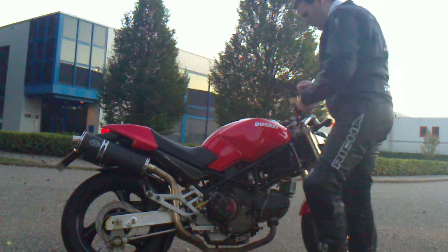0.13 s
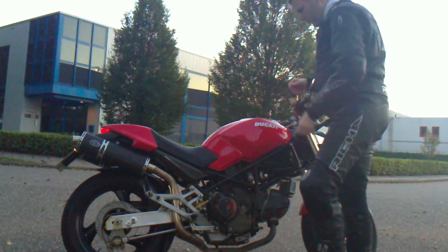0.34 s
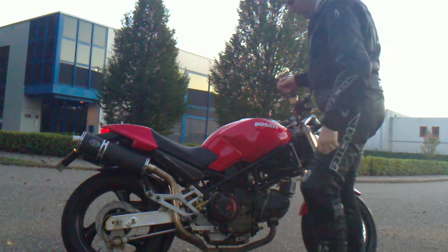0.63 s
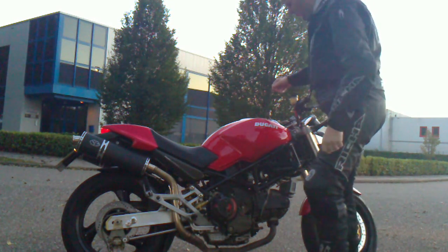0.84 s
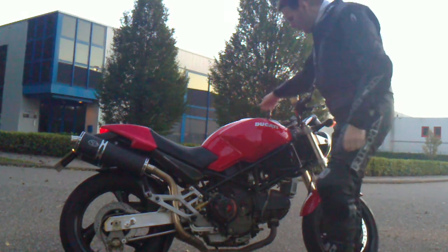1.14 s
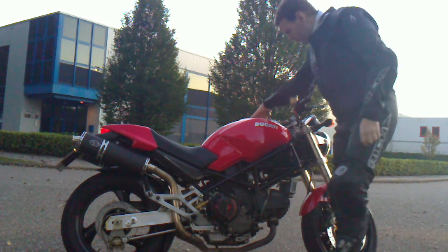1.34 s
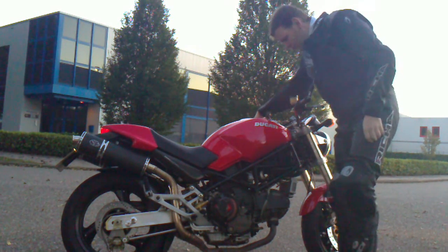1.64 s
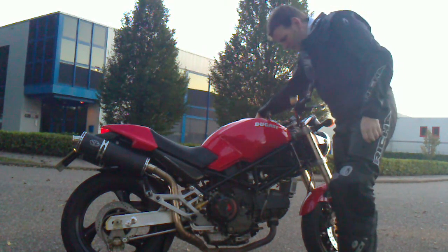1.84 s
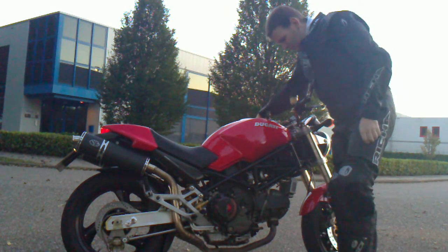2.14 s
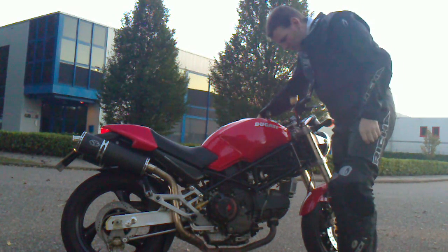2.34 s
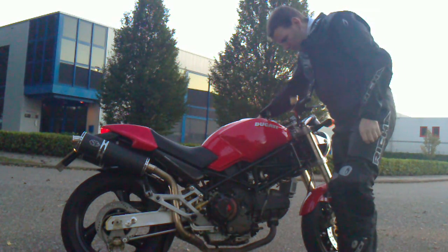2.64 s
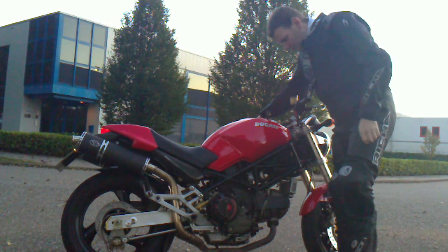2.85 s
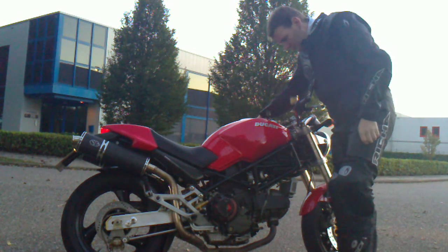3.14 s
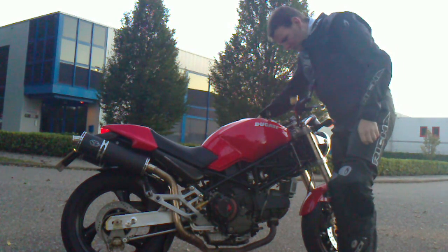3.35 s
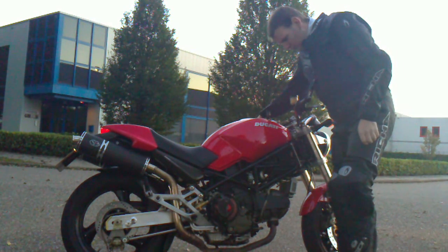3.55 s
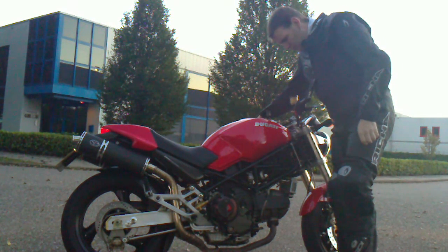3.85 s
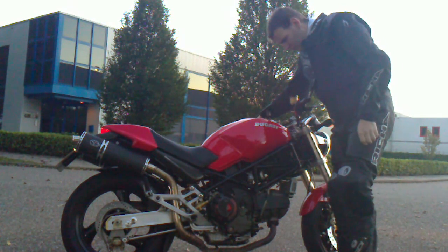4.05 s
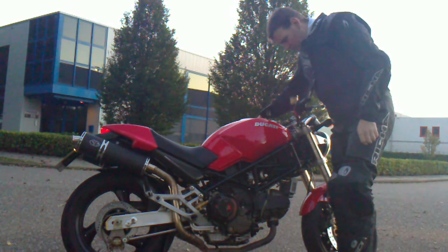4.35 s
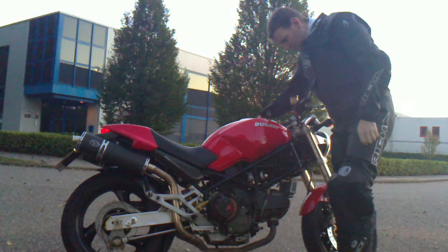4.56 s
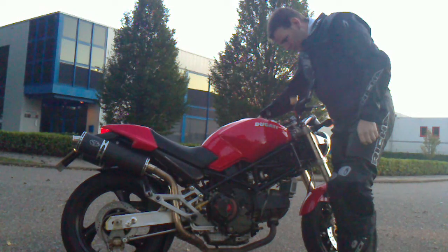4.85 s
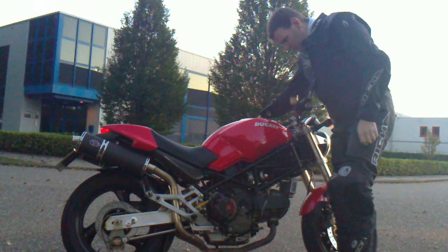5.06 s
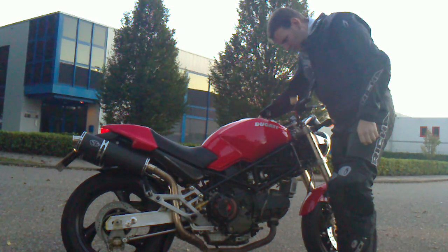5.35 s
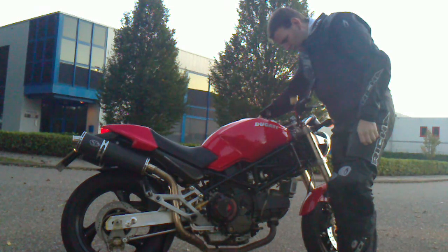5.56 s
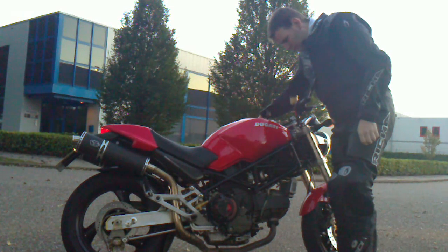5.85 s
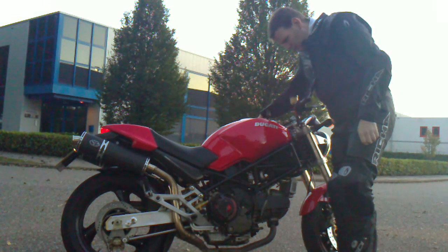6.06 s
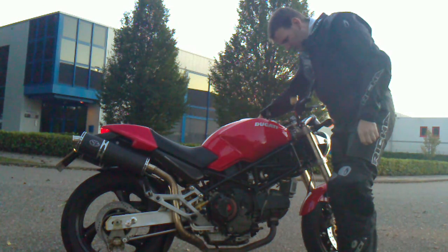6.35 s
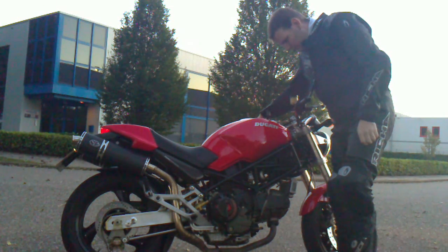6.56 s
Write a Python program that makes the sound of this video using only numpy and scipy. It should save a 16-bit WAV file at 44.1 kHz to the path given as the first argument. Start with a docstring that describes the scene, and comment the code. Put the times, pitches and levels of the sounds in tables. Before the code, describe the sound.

A twin-cylinder motorcycle idles outdoors with lumpy thumps and ticking, while its dry clutch rattles metallically for a few seconds.

```python
"""On open asphalt, a V-twin motorcycle idles. Two uneven firings in each engine cycle excite the
normal modes of the exhaust, heard as thumps. Valve impacts ring the casing over the broadband whirr of
belts and gears. For a while the clutch lever is pulled, and the loose dry plates clatter in their
basket as the crank jerks. Ticks and clatter reflect off the ground and, faintly, off buildings."""
import sys
import numpy as np
from scipy import signal
from scipy.fft import rfft, irfft, next_fast_len
from scipy.io import wavfile

SR = 44100
rng = np.random.default_rng(int(sys.argv[2]) if len(sys.argv) > 2 else 0)


def store_wav(level_fs):
    """Save 16-bit WAV to argv[1]."""
    pcm = np.round(np.clip(np.atleast_2d(level_fs), -1, 1) * 32767)
    wavfile.write(sys.argv[1], SR, pcm.T.astype(np.int16))


N = 295029


def gain_of(db):
    """Amplitude ratio of a level in decibels."""
    return 10 ** (np.asarray(db) / 20)


def unit_rms(x):
    """Normalisation to unit mean power."""
    return x / np.sqrt(np.mean(x ** 2) + 1e-20)


def coloured(x, points):
    """Spectral shaping: filters x by a curve of (f/Hz, level/dB) points."""
    f, db = np.transpose(points)
    size = next_fast_len(len(x))
    hz = np.fft.rfftfreq(size, 1 / SR)
    response = gain_of(np.interp(np.log(hz + 1), np.log(f + 1), db))
    return irfft(rfft(x, size) * response, size)[:len(x)]


def impulses(times, sizes):
    """Impulse train: one sample for each event."""
    at = np.round(np.asarray(times) * SR).astype(int)
    inside = (at >= 0) & (at < N)
    return np.bincount(at[inside], np.asarray(sizes)[inside], N)


def shot_noise(per_second, spread_db, cap):
    """Poisson process: impulses of random sign, with levels up to cap times the spread."""
    sizes = gain_of(spread_db * np.minimum(rng.exponential(1, N), cap))
    return sizes * (rng.random(N) < per_second / SR) * rng.choice([-1, 1], N)


def resonance(x, hz, width):
    """Damped oscillator: a two-pole resonance of peak gain 1."""
    r = np.exp(-np.pi * width / SR)
    return (1 - r) * signal.lfilter([1, 0, -1], [1, -2 * r * np.cos(2 * np.pi * hz / SR), r * r], x)


def struck(blows, modes, scatter):
    """Modal superposition: each blow lands elsewhere, so it shares its force among the modes anew."""
    out = np.zeros(N)
    for hz, width, db in modes:
        share = blows * (1 + scatter * rng.standard_normal(N)) / np.hypot(1, scatter)
        out += gain_of(db) * resonance(resonance(share, hz, width), hz, 5 * width + 400)
    return out


def crank_angle(cycle_times):
    """Uniform rotation within each cycle: 720 degrees from one cycle time to the next."""
    return 720 * np.interp(np.arange(N) / SR, cycle_times, np.arange(len(cycle_times)))


def reflections(x, t60=0.15):
    """Multipath propagation: direct sound, a bounce off the asphalt and faint scatter from buildings."""
    taps = np.zeros(SR // 4)
    at = np.arange(300, len(taps) - 20, 20) + rng.integers(0, 20, (len(taps) - 301) // 20)
    taps[at] = rng.choice([-1., 1.], len(at)) * gain_of(-60 * at / SR / t60)
    taps *= gain_of(-16) / np.linalg.norm(taps)
    taps[0], taps[70] = 1, .2  # direct path, ground bounce
    return signal.oaconvolve(x, taps)[:N]


# Noise spectrum of belts, gears and intake: f/Hz, relative density level/dB
DRIVE_SPECTRUM = [(200, -8.5), (300, -17), (580, -16.5), (900, -6), (1550, -6.5), (2020, -9.5),
                  (2710, -1.5), (3250, -4), (3770, -1.5), (4400, -5.5), (5800, -4.5), (9500, -11),
                  (12000, -39.5), (16000, -22)]
# Two faint wavering tones of the drive: f/Hz, bandwidth/Hz, relative level/dB
DRIVE_TONES = [(431.6, 13.4, -3.5), (502.7, 6.8, -4)]
# Envelope of those tones: t/s, level/dB
TONE_ENVELOPE = [(0, -60.5), (2, -57.5), (2.3, -64.5), (5.8, -64.5), (6.2, -62.5)]


def whirr(cycle_times, level_db=-34.5):
    """Amplitude modulation: the cyclic load swells the drive's noise; two narrow bands add faint tones."""
    angle, t = np.radians(crank_angle(cycle_times)), np.arange(N) / SR
    load_db = 2.15 * np.cos(angle - .6) + 1.14 * np.cos(angle / 2 + 0.12)
    grit = shot_noise(per_second=2500, spread_db=3.0, cap=3)
    drive = rng.standard_normal(N) + 0.37 * unit_rms(grit)
    hiss = gain_of(-2) * unit_rms(coloured(drive, DRIVE_SPECTRUM))
    casing = gain_of(-9) * unit_rms(struck(drive, CASING_MODES, scatter=2))
    tones = unit_rms(struck(rng.standard_normal(N), DRIVE_TONES, scatter=0.81))
    tone_db = np.interp(t, *np.transpose(TONE_ENVELOPE))
    return gain_of(level_db + load_db) * (hiss + casing) + gain_of(tone_db) * tones


# Valve closings in a cycle, relative to the loudest: crank angle/deg, level/dB; own tilt/(dB/octave)
VALVE_CLOSINGS = [(0, 0, -.7), (40, -12, -4), (95, -10, -2), (362, -6, -2.5), (445, -8, -2.5),
                  (645, -7, -3), (690, -13, -4)]
# Modes of the engine casing: f/Hz, bandwidth/Hz, relative level/dB
CASING_MODES = [(1550, 350, -9), (2300, 40, -3), (2740, 200, -1), (3680, 450, -2), (4785, 110, 2),
                (5535, 220, -2), (6215, 90, 1), (10280, 200, -14)]


def valves(cycle_times):
    """Impact excitation: each closing is a snap with a short scatter of bounces that ring the casing."""
    cycle_db = -15 + rng.standard_normal(len(cycle_times) - 1)
    jitter = rng.standard_normal((len(cycle_db), len(VALVE_CLOSINGS), 2))
    t, impacts = np.arange(1500) / SR, np.zeros(N)
    bounces = np.exp(-t / .0012) + .08 * np.exp(-t / .007)
    for k, (degrees, db, tilt) in enumerate(VALVE_CLOSINGS):
        lesser = k > 0  # the lesser closings vary in time and force
        times = cycle_times[:-1] + np.diff(cycle_times) * degrees / 720 + lesser * .0006 * jitter[:, k, 0]
        sizes = gain_of(cycle_db + db + lesser * 2.0 * jitter[:, k, 1])
        force = signal.oaconvolve(impulses(times, sizes), bounces)[:N]
        slope = [(500, -3 * tilt), (4000, 0), (16000, 2 * tilt)]
        impacts += coloured(force * rng.choice([-1, 1], N), slope)
    snap = coloured(impacts, [(700, -40), (2000, -16), (3000, -7), (4500, -8),
                              (5500, 0), (6500, -5), (11000, -8), (16000, -9)])
    return gain_of(1.5) * snap + gain_of(3.5) * struck(impacts, CASING_MODES, scatter=0.4)


# Slaps of the clutch plates on their basket: t/s, relative level/dB, duration/ms
PLATE_SLAPS = [(2.4146, -16, 2.5), (2.4681, -25, 3.3), (2.482, -18, 6), (2.512, -16, 8.3),
               (2.5176, -21.5, 9.5), (2.544, -29, 8), (2.5734, -27, 6), (2.619, -19, 26),
               (2.6907, -16.5, 2.8), (2.705, -13.5, 4.5), (2.732, -19, 17.4), (2.752, -40, 6.5),
               (2.7945, -17.5, 11), (2.836, -19.5, 4.5), (2.8467, -19.5, 12), (2.907, -24, 3.8),
               (2.919, -20, 9.3), (2.952, -21.5, 21), (2.967, -16.5, 6.7), (3.018, -20, 26),
               (3.0654, -17, 13), (3.0736, -32, 6.4), (3.138, -21.5, 5.7), (3.147, -20, 13),
               (3.1813, -24, 20), (3.1938, -14, 9.2), (3.259, -15.5, 3.8), (3.267, -26, 22),
               (3.308, -14, 9.6), (3.3678, -18, 10.6), (3.414, -17.5, 4.9), (3.4218, -20.5, 10),
               (3.4844, -17, 9.3), (3.4925, -23.5, 12), (3.526, -17.5, 7.9), (3.5337, -23.5, 18),
               (3.5978, -20, 8.3), (3.607, -25, 11), (3.646, -21, 8), (3.6513, -20.5, 10), (3.7224, -26, 9),
               (3.735, -15, 6.6), (3.772, -16.5, 28), (3.8393, -16.5, 30), (3.8835, -17.5, 20),
               (3.947, -15.5, 3.6), (3.992, -18, 2.1), (3.999, -20.5, 18), (4.0553, -23.5, 5.5),
               (4.062, -18.5, 20), (4.101, -20, 18), (4.1613, -23.5, 9.5), (4.177, -26, 17),
               (4.219, -10.5, 3.7), (4.277, -17, 26), (4.321, -20, 21), (4.329, -30, 4.6), (4.379, -18, 20),
               (4.428, -28, 5.5), (4.4372, -14, 9.1), (4.491, -21, 33), (4.5336, -19, 21),
               (4.594, -22.5, 24), (4.642, -17, 23), (4.709, -18, 25.4), (4.7519, -14, 11.4),
               (4.8093, -26, 8.9), (4.818, -22.5, 9), (4.859, -18.5, 9), (4.937, -18.5, 15),
               (4.9714, -16.5, 23), (5.034, -20.5, 27), (5.077, -18.5, 16), (5.141, -30, 4.5),
               (5.155, -18, 12.6), (5.187, -17.5, 18), (5.249, -21, 19.5), (5.289, -19, 27),
               (5.36, -23.5, 4.5), (5.374, -18.5, 12), (5.404, -19, 20.5), (5.4887, -22, 11),
               (5.52, -18.5, 15), (5.524, -22, 13), (5.59, -31, 6.5), (5.607, -18, 9.4), (5.635, -20, 13),
               (5.647, -20, 11), (5.677, -37, 5.8), (5.708, -19, 2.5), (5.7231, -22, 3.5),
               (5.7517, -15.5, 3.1), (5.765, -10, 2), (5.787, -25.5, 5.4), (5.824, -20.5, 3.6),
               (5.8376, -18.5, 6.7), (5.866, -22, 7.9), (5.879, -20.5, 11), (5.9965, -15.5, 4.1)]
# Free play of the plates as the lever moves: t/s, play (0 to 1)
PLATE_PLAY = [(2.4, 0.05), (2.75, 0.96), (5.55, 0.63), (5.8, 0)]
# Modes of the plates: f/Hz, bandwidth/Hz, relative level/dB
PLATE_MODES = [(8110, 70, -4), (8370, 260, -8), (8680, 110, 0), (8900, 220, -5), (9160, 110, -5),
               (9800, 500, -28), (10460, 170, -14), (11910, 110, -18), (13570, 110, -14), (14300, 600, -25),
               (15200, 700, -30)]
# Modes of the basket: f/Hz, bandwidth/Hz, relative level/dB
BASKET_MODES = [(1050, 300, -21), (1495, 170, -9), (2150, 90, -14), (2300, 100, -5), (2520, 70, -10),
                (2915, 80, 2.5), (3503, 65, -1), (4050, 450, -10), (4543, 50, 0), (4780, 130, -10),
                (5600, 500, -14), (6250, 400, -12), (6865, 260, -5)]
# Broadband part of a plate blow: f/Hz, relative density level/dB
KNOCK_SPECTRUM = [(600, -60), (2000, -26), (3900, -8), (8600, -8), (11500, -26), (16000, -22)]


def clutch():
    """Rattle across a clearance: each slap is a run of blows that builds, then dies into stray hits."""
    blows = unit_rms(shot_noise(per_second=1800, spread_db=2.66, cap=2.6))
    blows += 0.38 * rng.standard_normal(N)
    t, plate_force, basket_force = np.arange(4000) / SR, np.zeros(N), np.zeros(N)
    landing_snap = 0.47 * np.exp(-t / 0.00082)
    for onset, db, length_ms in PLATE_SLAPS:
        start, length = round(onset * SR), length_ms / 1000
        span = slice(start, start + len(t))
        play = np.interp(onset, *np.transpose(PLATE_PLAY))
        rise = 0.17 * length
        build = np.minimum(0.31 + 0.14 * t / rise, 1)
        run = build * np.exp(-(np.maximum(t - rise, 0) / (length - rise)) ** 2) + landing_snap
        stray = build * play
        plate_force[span] += gain_of(db) * (run + 0.18 * stray * np.exp(-t / 0.086))
        # The heavy basket chatters on longer, and sounds more with little play and in long slaps.
        basket_db = db - 9 + 9.5 * (1 - play) + 3 * np.log10(length / 0.0085)
        basket_force[span] += gain_of(basket_db) * (run + 0.37 * stray * np.exp(-t / 0.092))
    plates = struck(plate_force * blows, PLATE_MODES, scatter=6.0)
    basket = struck(basket_force * blows, BASKET_MODES, scatter=1.74)
    knock = coloured(basket_force * blows, KNOCK_SPECTRUM)
    return gain_of(16) * plates + gain_of(14.5) * basket + gain_of(2.5) * knock


# Cycles of the lumpy idle: loudest valve closing t/s, first firing level/dB, second firing level/dB
ENGINE_CYCLES = [(0.0395, -30.5, -23.5), (0.167, -26.5, -25), (0.29, -29, -24.5), (.411, -36, -22),
                 (0.5358, -32, -26), (0.6631, -28, -21.5), (0.7789, -28, -24.5), (0.8949, -27, -23.5),
                 (1.0142, -35, -24.5), (1.14, -26.5, -21), (1.2562, -22, -30), (1.3722, -30, -22),
                 (1.488, -30.5, -24), (1.6063, -22, -24), (1.7225, -30, -25), (1.8412, -23, -22.5),
                 (1.9595, -45, -23.5), (2.0767, -22, -24), (2.1915, -28, -22.5), (2.302, -20.5, -29),
                 (2.4114, -41, -22.5), (2.5231, -21, -26), (2.6307, -45, -23), (2.7445, -19.5, -23),
                 (2.845, -45, -32), (2.9635, -25.5, -22.5), (3.076, -27, -30), (3.195, -27, -23.5),
                 (3.3115, -23, -23.5), (3.423, -44, -24.5), (3.5395, -24.5, -24.5), (3.6568, -31.5, -30),
                 (3.782, -23.5, -23.5), (3.8966, -21, -29), (3.9978, -41, -21.5), (4.1125, -20.5, -51),
                 (4.2198, -34, -22), (4.332, -19.5, -38), (4.4358, -34, -22), (4.5487, -21, -31),
                 (4.648, -58, -22), (4.7579, -21, -21.5), (4.8596, -33, -28), (4.9801, -22, -21.5),
                 (5.0887, -22.5, -33), (5.1949, -24.5, -22.5), (5.303, -34, -24.5), (5.416, -25, -25.5),
                 (5.532, -26, -24.5), (5.649, -25.5, -24), (5.7626, -31, -26.5), (5.8798, -23.5, -24.5),
                 (5.9963, -26.5, -24), (6.106, -27, -26.5), (6.226, -31, -23.5), (6.3375, -20, -25.5),
                 (6.448, -29.5, -30), (6.5649, -23, -22), (6.6774, -36, -32.5)]
# Modes of pipes and silencer: f/Hz, relative level/dB, decay time T60/s, polarity
PIPE_MODES = [(48, -2.4, .159, -1), (65, 3.4, .066, 1), (102.3, 12, .082, 1), (139.2, 12, .055, -1),
              (195.6, 9.5, .27, -1)]


def exhaust(first_ms=-25.5, second_ms=19.98, full_db=-18.5):
    """Pipe resonance: each firing sends a soft puff into the modes, and flowing gas rumbles after it."""
    times, first_db, second_db = np.transpose(ENGINE_CYCLES)
    # A strong first firing speeds the crank, so the two thumps draw closer.
    hurry_ms = 4.7 * gain_of(first_db - full_db) ** 1.87
    firing_times = np.r_[times + (first_ms + hurry_ms) / 1e3, times + (second_ms - hurry_ms) / 1e3]
    firings = impulses(firing_times, gain_of(np.r_[first_db, second_db]))
    t = np.arange(SR // 4) / SR
    pipe = sum(sign * gain_of(db - 60 * t / t60) * np.sin(2 * np.pi * hz * t)
               for hz, db, t60, sign in PIPE_MODES)
    puff = signal.windows.gaussian(801, .0022 * SR)
    thump = np.convolve(pipe, puff)
    peak = np.argmax(thump)
    thumps = signal.oaconvolve(firings, thump / thump[peak])[peak:peak + N]
    flow = unit_rms(signal.oaconvolve(firings, np.exp(-t / 0.022))[:N])
    gas_spectrum = [(12, -47), (20, -25), (113, 0.5), (140, -3.5),
                    (189, -5.5), (400, -23.5), (520, -42), (880, -120)]
    rumble = unit_rms(coloured(rng.standard_normal(N) * (0.94 + flow), gas_spectrum))
    return gain_of(-1.0) * thumps + gain_of(-45) * rumble


def scene():
    """Linear superposition of the sources in one channel; only the metal impacts are reflected."""
    times = np.transpose(ENGINE_CYCLES)[0]
    cycle_times = np.r_[2 * times[0] - times[1], times, 2 * times[-1] - times[-2]]  # one more at each end
    return (exhaust() + whirr(cycle_times) + reflections(valves(cycle_times) + clutch()))[None]


def record(dry, cutoff_hz=15750):
    """Band limiting: a linear-phase low-pass removes the highest treble."""
    low_pass = signal.firwin(511, cutoff_hz, window=("kaiser", 9), fs=SR)
    return signal.oaconvolve(dry, low_pass[None], "same")


dry = scene()
out = record(dry)
store_wav(out)
```